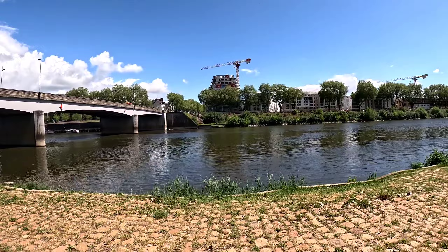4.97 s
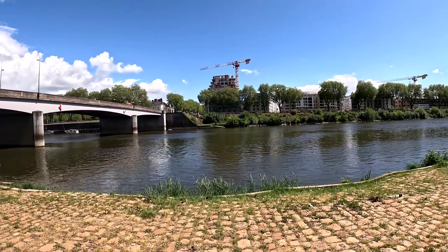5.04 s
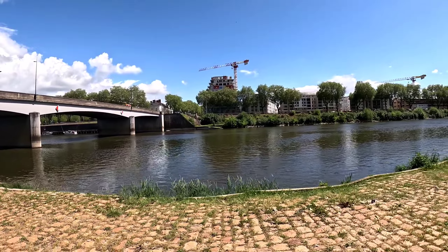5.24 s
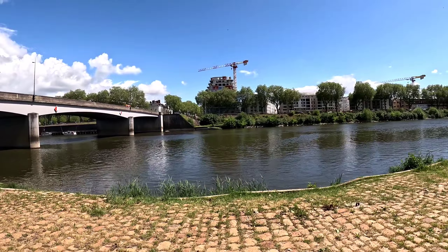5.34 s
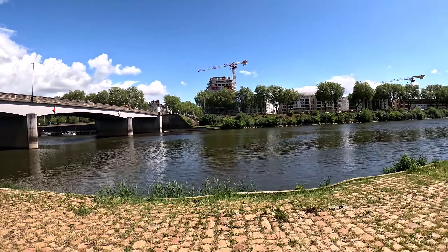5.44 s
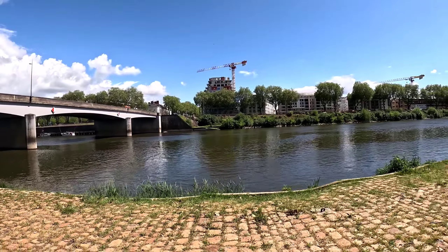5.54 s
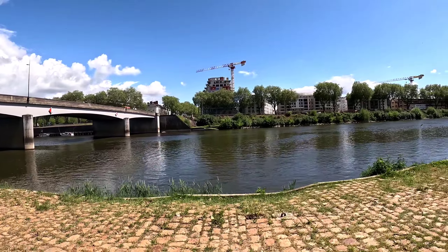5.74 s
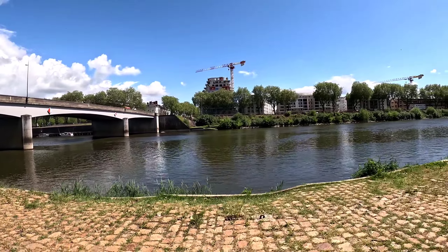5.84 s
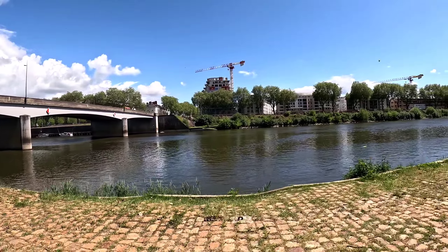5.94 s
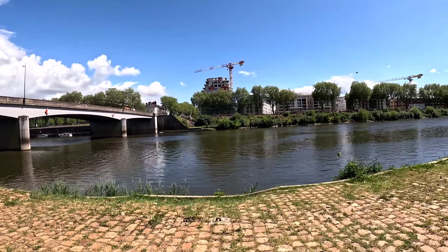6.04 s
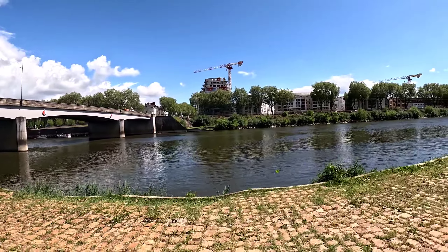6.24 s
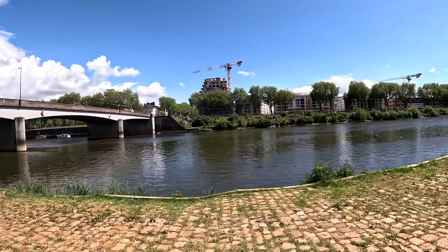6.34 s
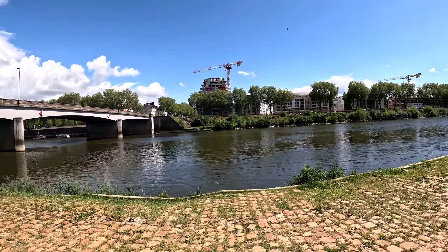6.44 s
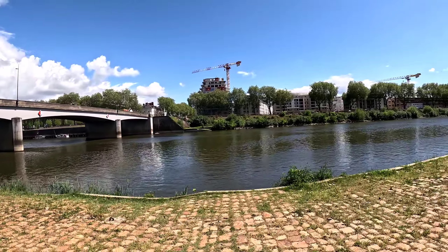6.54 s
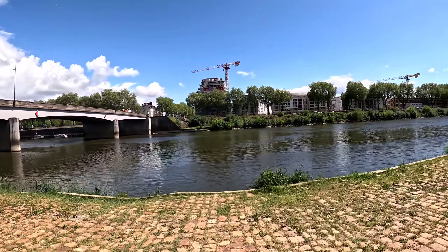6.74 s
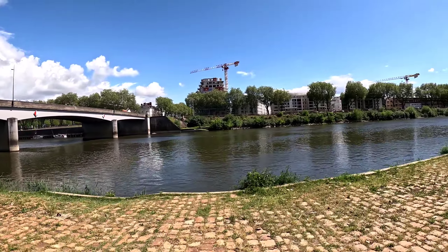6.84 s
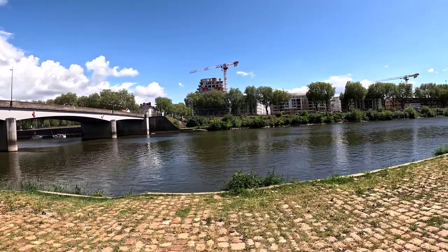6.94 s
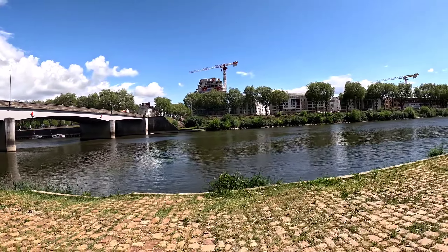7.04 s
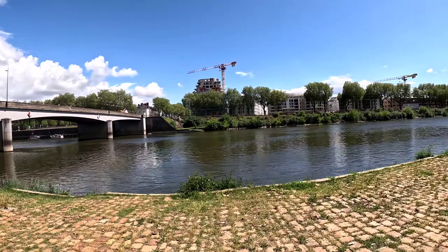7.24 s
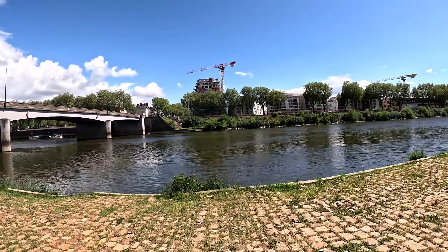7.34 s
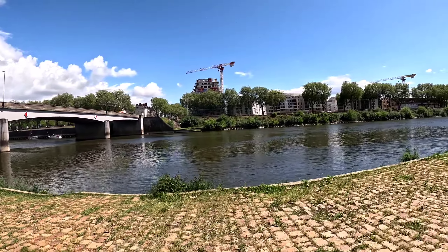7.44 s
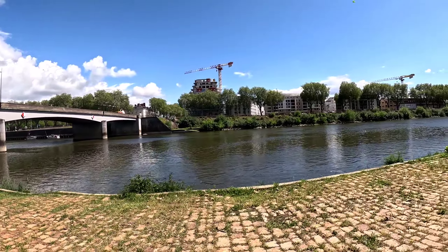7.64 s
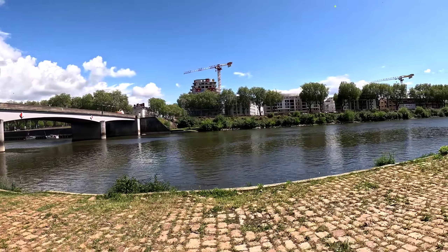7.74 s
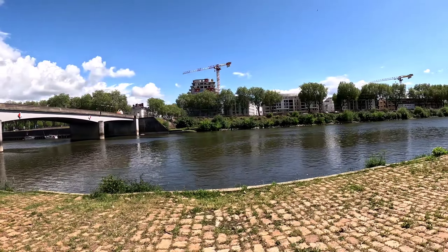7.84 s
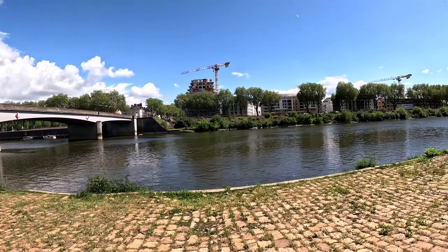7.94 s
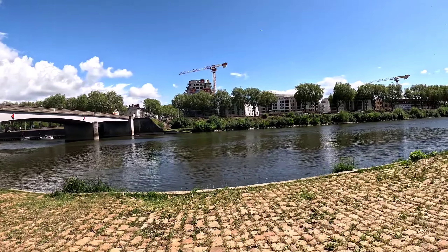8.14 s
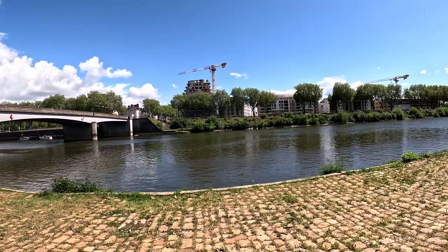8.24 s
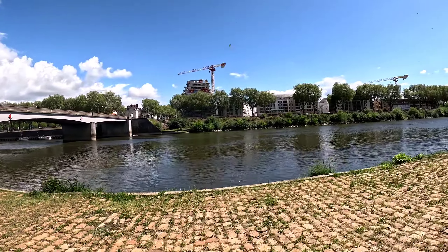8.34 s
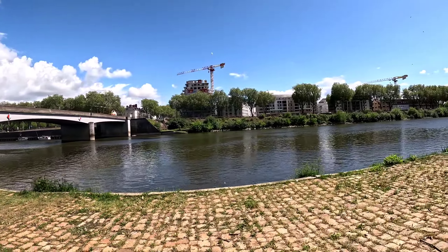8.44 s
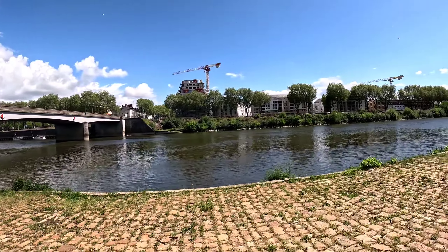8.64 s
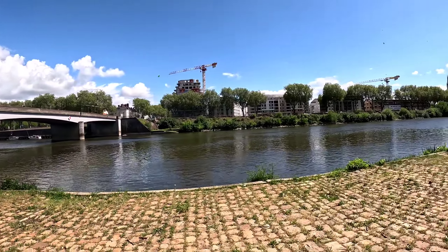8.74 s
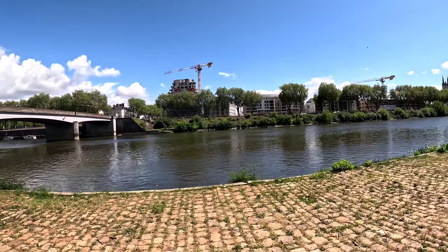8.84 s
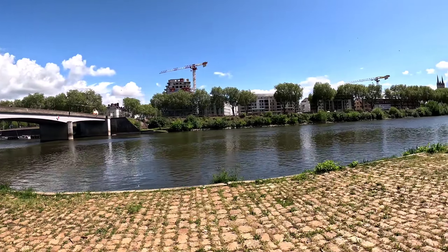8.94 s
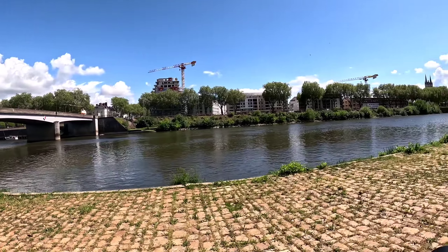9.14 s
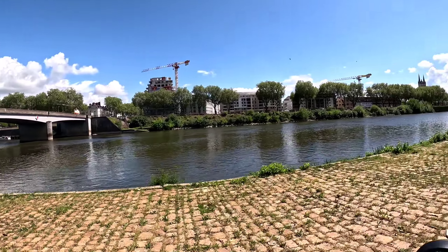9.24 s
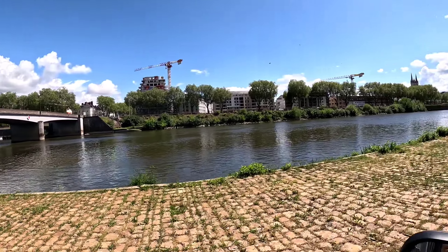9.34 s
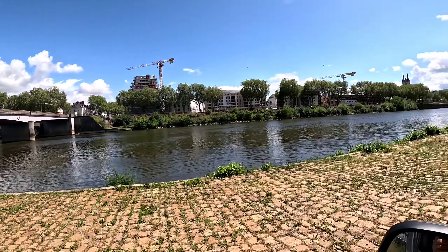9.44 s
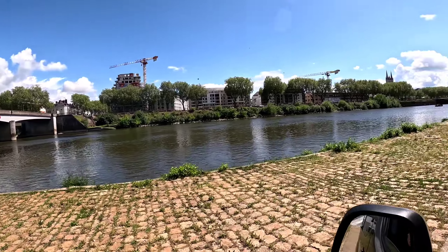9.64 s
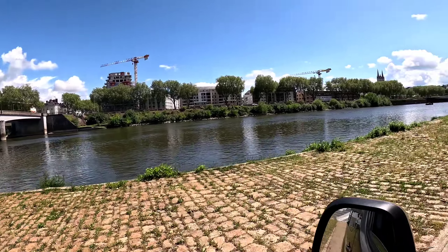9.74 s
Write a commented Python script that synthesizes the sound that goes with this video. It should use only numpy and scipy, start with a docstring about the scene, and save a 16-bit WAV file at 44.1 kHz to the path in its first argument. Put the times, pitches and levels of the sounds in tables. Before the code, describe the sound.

Heard on board, tyres rumble over cobbles with knocks and thumps while a low engine drone slowly rises in pitch.

```python
"""A four-cylinder engine drones, then rises in pitch: a van gathers speed on a cobbled quay, heard on board.
Periodic firing gives the drone, and resonances of the body reinforce its overtones. Random impacts
on the stones make the tyres rumble, patter and crunch grit. Rough patches thump the suspension,
loose fittings knock and clink, flung stones tick, and turbulent air buffets the microphone."""
import sys
import numpy as np
from scipy import signal
from scipy.fft import rfft, irfft, next_fast_len
from scipy.io import wavfile
from scipy.ndimage import uniform_filter1d, minimum_filter1d

SR = 44100
rng = np.random.default_rng(int(sys.argv[2]) if len(sys.argv) > 2 else 0)


def unload_wav(signal):
    """Save mono or channel-first audio to the path in sys.argv[1] as 16-bit WAV at rate SR, clipped to [-1, 1]."""
    wavfile.write(
        sys.argv[1],
        SR,
        np.round(np.clip(np.atleast_2d(signal).T, -1, 1) * 32767).astype(np.int16),
    )


N = 432180
TIME = np.arange(N) / SR

# Levels are relative within each table. Spectral densities: f/Hz, level/dB
EDDY_SPECTRUM = [(4, -27.5), (11, -2.5), (17, 6), (24, -1.5), (36, -6.5), (60, -15.5), (110, -43),
                 (300, -82), (3000, -130)]
RUMBLE_SPECTRUM = [(25, -6), (55, 1), (90, 2.5), (130, -2.5), (200, -7.5), (300, -12), (450, -20.5),
                   (700, -23), (1500, -54), (10000, -110)]
ROAR_SPECTRUM = [(100, -20), (350, 4.5), (600, -0.5), (1100, 1.5), (1600, -5.5), (1900, -5), (2400, -12.5),
                 (3000, -13.5), (4000, -19), (5500, -36.5), (7500, -34.5), (15000, -81.5)]
GRIT_SPECTRUM = [(1200, -12), (3000, 0), (4000, 0.5), (5000, -1), (5600, -4.5), (6500, -6.5), (7400, -15),
                 (8500, -7.5), (9400, -17), (10400, -17.5), (11500, -34.5), (15500, -60)]
GRAVEL_SPECTRUM = [(1000, -23), (3000, 0.5), (5300, -4.5), (7500, -7.5), (10300, -11.5), (11800, -22),
                   (15500, -39)]
TICK_SPECTRUM = [(200, -9.5), (600, 7), (1300, -0.5), (2200, 4.5), (3500, -3), (5200, -9), (6500, -12),
                 (9000, -17), (11500, -29), (15500, -40)]
CLINK_SPECTRUM = [(300, 10), (1100, 4), (2200, -6), (3600, 1), (5600, -4), (6300, -12), (7700, -15),
                  (8700, -15), (11500, -30), (15500, -32)]
KNOCK_SPECTRUM = [(100, -28), (400, 0), (800, 12), (1300, 2.5), (2000, -7.5), (3500, -12.5), (7000, -27),
                  (11000, -38), (15000, -73)]
THUMP_SPECTRUM = [(30, -35.5), (100, 22), (250, 6), (450, 1), (750, 1.5), (1300, -10.5), (3000, -57),
                  (14000, -102)]

# buffeting, which sets in once the van is rolling: t/s, level/dB
WIND_LEVEL = [(0, -44.5), (1.7, -34.5), (2.0, -22.5), (4.7, -20.5), (5.3, -25), (6.1, -20.5), (7.0, -26),
              (7.9, -23.5), (8.55, -28.5), (8.75, -17.5), (9.0, -27.5), (9.2, -25.5), (9.33, -16.5),
              (9.5, -26), (9.8, -21.5)]
# tyre roar, which rumble, grit, gravel and hiss follow: t/s, level/dB
ROAR_LEVEL = [(0.2, -62), (1.25, -54), (2.1, -42.5), (2.75, -43), (3.42, -37.5), (4.2, -43.5),
              (5.25, -46.5), (5.6, -42), (6.7, -40.5), (7.35, -37.5), (7.9, -44), (8.32, -44.5),
              (8.46, -41), (9.2, -44), (9.8, -47.5)]
# ring of a body panel relative to the roar: t/s, level/dB
PANEL_LEVEL = [(1.0, -12), (2.3, -13), (3.1, -11), (3.7, -9.5), (4.4, -9.5), (5.6, -10), (7.2, -13.5),
               (8.0, -15.5), (9.8, -9.5)]
# rougher or smoother paving: t/s, duration/s, change of rumble/dB
PAVING_PATCHES = [(0, 2.8, -2.5), (2.603, 0.093, 6), (2.802, 0.16, 6.5), (3.095, 0.23, 4.5),
                  (3.367, 0.28, -5.5), (3.758, 0.56, 2), (4.752, 0.62, 1.5), (5.44, 0.28, 4),
                  (5.887, 0.105, 4), (6.19, 0.27, 1), (6.423, 0.25, -7.5), (6.66, 1.2, -4),
                  (8.336, 0.11, 3)]
# sunken stones that jolt a wheel: t/s, level/dB
SUNKEN_STONES = [(2.67, -32), (2.92, -38), (5.49, -36), (5.96, -29.5), (6.209, -26), (6.32, -27),
                 (6.97, -27.5), (7.12, -41), (7.379, -35), (8.111, -36), (8.381, -27), (9.32, -28)]
# clumps of gravel crushed by a tyre: t/s, level/dB
GRAVEL_CLUMPS = [(0.08, -72), (0.98, -71), (1.49, -63), (1.57, -78), (2.07, -64), (2.49, -57.5),
                 (3.25, -65), (3.63, -58), (3.88, -59), (4.02, -60), (5.5, -65), (5.81, -61)]

# stones flung by the tyres: t/s, level/dB, ring f/Hz, ring gain, rattle T60/s
STONE_TICKS = [(1.262, -48, 3730, 4.1, 0.026), (1.477, -49, 5430, 2, 0.045), (1.628, -49, 4050, 1.5, .03),
               (1.658, -59, 4300, 6, .015), (1.752, -36.5, 2930, 1.3, 0.024), (2.095, -41, 3100, 4, 0.071),
               (2.559, -42, 3200, 1, 0.036), (3.046, -45, 5920, 1, .05), (3.393, -44, 3320, 2.2, .14),
               (3.472, -36, 5240, 1, 0.044), (3.697, -45, 6000, 1, .03), (3.862, -46, 6300, 2.3, .025),
               (4.022, -49, 6200, 2, .09), (4.317, -46, 5160, 5.6, 0.016), (4.535, -42, 3300, 2.2, 0.17),
               (4.731, -47, 5500, 2, .05), (5.507, -51, 7000, 1, .03), (6.54, -49, 6540, 1, .03),
               (7.283, -43, 3340, 1, .06), (7.304, -46, 6500, 1, 0.058), (7.414, -50, 8000, 1, .04),
               (7.612, -38, 3510, 0.3, 0.081), (8.042, -46.5, 4500, 1, .04), (9.1, -48, 4090, 1, .06),
               (9.516, -49, 3470, 0.89, 0.064)]
# bounces of a metal fitting: t/s, level/dB, ring f/Hz, ring gain, rattle T60/s
METAL_CLINKS = [(2.416, -32.5, 6500, 1, 0.047), (2.4275, -36.5, 5600, 1.2, .03),
                (2.4304, -27.5, 4600, 0.85, 0.02), (2.436, -37, 3730, 0.87, 0.067),
                (2.453, -40.5, 4400, 0.6, 0.1)]
# knocks of loose fittings: t/s, level/dB, ring f/Hz, ring gain, rattle T60/s, treble cutoff f/Hz
FITTING_KNOCKS = [(1.517, -30.5, 850, 0.59, 0.072, 12000), (1.748, -27, 1290, 4, 0.053, 12000),
                  (1.752, -20, 1470, 8.7, 0.064, 12000), (2.171, -24, 980, 1.6, 0.032, 5000),
                  (2.61, -20, 860, 0.62, 0.067, 8000), (2.768, -28, 926, 0.81, 0.036, 4000),
                  (3.398, -23, 1120, 1.3, .06, 5000), (3.473, -26, 900, 0.5, .03, 12000),
                  (3.861, -15.5, 520, 1.2, 0.065, 3500), (3.989, -29, 794, 0.58, .04, 5000),
                  (4.891, -31, 700, 1.3, 0.046, 1500), (4.899, -19, 1300, 1, 0.036, 1600),
                  (7.056, -24, 900, 1.2, 0.035, 4000)]
# blows to the suspension: t/s, level/dB, ring f/Hz, ring gain
SUSPENSION_BLOWS = [(2.904, -21, 240, 4), (2.932, -18, 210, 10), (3.042, -27, 624, 2.3),
                    (3.126, -26, 330, 6.7), (3.151, -28, 297, 8.7), (3.253, -18.5, 228, 4.5),
                    (3.274, -20.5, 427, 6), (3.296, -31, 139, 5.5), (3.328, -25, 405, 2.6),
                    (3.988, -23.5, 522, 2.2), (4.018, -25, 420, 6.5), (4.08, -27, 293, 4),
                    (4.83, -27, 417, 5), (5.677, -24, 570, 4.7), (5.681, -17.5, 291, 1.4),
                    (5.698, -27, 213, 8.9), (5.843, -23.5, 300, 5.6), (5.902, -22, 265, 2.8),
                    (5.934, -16, 418, 2.6), (5.948, -27, 382, 7.8), (5.97, -25, 565, 2),
                    (6.357, -22, 400, 3), (8.384, -21, 298, 4.8)]

# firing rate, which sags under load, climbs and levels off: t/s, f/Hz
FIRING_RATE = [(0.0, 46.0), (0.5, 45.6), (1.0, 44.2), (2.0, 43.6), (2.5, 44.1), (3.0, 45.8), (3.4, 47.7),
               (4.4, 51.4), (6.0, 58.6), (7.0, 62.3), (7.5, 63.8), (8.3, 65.7), (9.4, 67.4), (9.8, 67.3)]
# engine load: t/s, exhaust boom level/dB, overtone level/dB
ENGINE_LOAD = [(0, -41, -58), (1.3, -38, -45.5), (2.35, -31, -40.5), (2.65, -28.5, -40.5),
               (3.3, -24, -40.5), (4.6, -29.5, -42.5), (6.1, -26, -50), (6.8, -20.5, -37.5),
               (8.5, -22.5, -35.5), (9.8, -23, -37)]
# engine overtones: multiple of the firing rate, level/dB
ENGINE_ORDERS = [(2, -4.5), (2.5, -16), (3, -16.5), (3.5, -21), (4, -11.5), (5, -14), (6, -14.5), (7, -16),
                 (8, -25), (9, -24), (11, -25.5), (12, -24), (13, -27.5), (14, -26.5), (15, -24),
                 (16, -25.5), (18, -36.5), (19, -32.5)]
# resonances of the van's body: f/Hz, bandwidth/Hz, gain/dB
BODY_MODES = [(88, 16, -2.5), (186.5, 2.5, 11), (228, 15, -1.5), (267.8, 24, -1), (485.6, 16, -0.5),
              (779, 29, 11)]


def amp(db):
    """Amplitude ratio of a level in decibels."""
    return 10 ** (np.asarray(db) / 20)


def unit(x):
    """Normalisation to an rms of 1."""
    return x / np.sqrt(np.mean(x ** 2) + 1e-20)


def curve(rows, column=1):
    """Linear interpolation of a table column in time."""
    rows = np.array(rows)
    return np.interp(TIME, rows[:, 0], rows[:, column])


def colour(x, spectrum):
    """Minimum-phase, hence causal, filtering to the given spectrum."""
    hz, db = np.transpose(spectrum)
    size = next_fast_len(len(x) + 8192)
    f = abs(np.fft.fftfreq(size, 1 / SR))
    log_gain = np.log(amp(np.interp(np.log(f + 1), np.log(hz + 1), db)))
    response = np.exp(np.conj(signal.hilbert(log_gain)))[:size // 2 + 1]
    return irfft(rfft(x, size) * response, size)[:len(x)]


def drift(hz, size=16384):
    """Slow random modulation: noise of unit rms that rolls off above hz."""
    f = np.arange(size // 2 + 1) * SR / N
    slow = irfft(rfft(rng.standard_normal(size)) * np.exp(-(f / hz) ** 2) * (f > 0), size)
    return np.interp(TIME, np.linspace(0, TIME[-1], size), unit(slow))


def impacts(per_s, spread_db):
    """Shot noise: randomly timed impulses of unequal size."""
    size = amp(spread_db * np.minimum(rng.exponential(1, N), 4))
    return unit(size * rng.choice([-1, 1], N) * (rng.random(N) < per_s / SR))


def resonate(x, hz, width_hz, stages=1):
    """Resonance: identical stages in series, with a gain of 1 at the centre."""
    for _ in range(stages):
        x = signal.lfilter(*signal.iirpeak(hz, hz / width_hz, SR), x)
    return x


def follow_roar(share, cruise_db=-42):
    """Level change in dB, proportional to the roar's departure from its cruising level."""
    return share * (curve(ROAR_LEVEL) - cruise_db)


def blows(rows, spectrum, level_db, rattle, q, rise_s, rattle_s=0.061):
    """Impact excitation: a scrape swells to a contact and rattles away, driving a part's resonance."""
    t = np.arange(SR // 4) / SR - rise_s
    swell = np.minimum(1 + t / rise_s, 1) ** 2

    def blow(db, hz, ring_gain, t60=rattle_s, cutoff_hz=SR):
        """A soft contact acts as a low-pass filter on the force of one blow."""
        decay = amp(-60 * np.maximum(t, 0) / t60)
        force = rattle * rng.standard_normal(len(t)) * swell * decay
        force[np.argmin(abs(t))] += 1
        force = signal.lfilter([1], [1, -np.exp(-2 * np.pi * cutoff_hz / SR)], force)
        ringing = resonate(force, hz, hz / q, stages=2)
        sound = colour(force + ring_gain * ringing, spectrum)
        peak_rms = np.sqrt(uniform_filter1d(sound ** 2, size=128, mode="constant").max())
        return amp(db + level_db) * sound / peak_rms

    out = np.zeros(N)
    for s, *columns in rows:
        span = out[round(s * SR):][:len(t)]
        span += blow(*columns)[:len(span)]
    return out


def buffeting(level_db=2.0, gust_db=2, gust_hz=4):
    """Turbulence: slow eddies press on the microphone, swelling in random gusts."""
    eddies = colour(rng.standard_normal(N), EDDY_SPECTRUM)
    running_rms = np.sqrt(uniform_filter1d(eddies ** 2, size=11000) + 1e-20)
    return amp(curve(WIND_LEVEL) + level_db + gust_db * drift(gust_hz)) * eddies / running_rms


def tread_hiss(level_db=-75, db_per_firing_hz=3.0, flutter_db=1.5):
    """Narrow-band noise from the tread grows with speed and follows the roar."""
    firing_hz = curve(FIRING_RATE)
    speed_db = db_per_firing_hz * (firing_hz - firing_hz.max())
    band = unit(resonate(rng.standard_normal(N), hz=8450, width_hz=1200, stages=2))
    return amp(level_db + speed_db + follow_roar(0.9) + flutter_db * drift(20)) * band


def grit(tyre_load, level_db=-63.0, load_db=0.5):
    """Crushed grit gives shot noise and hiss, amplitude-modulated by the tyre load."""
    grains = (impacts(per_s=500, spread_db=2.1) + rng.standard_normal(N)) * amp(load_db * tyre_load)
    return amp(level_db + follow_roar(1.05)) * unit(colour(grains, GRIT_SPECTRUM))


def gravel(loose_db=-78, flicker_db=2.0, rise_s=0.0035, t60=0.43):
    """Stones crackle under the tread as shot noise; each crushed clump adds an exponential decay."""
    envelope = amp(loose_db + follow_roar(0.86))
    for s, db in GRAVEL_CLUMPS:
        age = np.maximum(TIME - s, 0)
        envelope += np.minimum(age / rise_s, 1) * amp(db - 60 * age / t60)
    pops = impacts(per_s=1100, spread_db=-3.5) * amp(flicker_db * drift(22))
    return envelope * unit(colour(pops, GRAVEL_SPECTRUM))


def stone_ticks():
    """Small flung stones excite narrow, high resonances on impact."""
    return blows(STONE_TICKS, TICK_SPECTRUM, level_db=-1.0, rattle=0.21, q=9.9, rise_s=0.0029)


def metal_clinks():
    """A metal fitting rings in free vibration at each bounce."""
    return blows(METAL_CLINKS, CLINK_SPECTRUM, level_db=2.5, rattle=0.15, q=7.8, rise_s=0.0019)


def fitting_knocks():
    """Loose fittings strike and rattle, exciting heavily damped midrange resonances."""
    return blows(FITTING_KNOCKS, KNOCK_SPECTRUM, level_db=-8.5, rattle=0.21, q=2.2, rise_s=0.00155)


def suspension_thumps():
    """Impulses from the rough road excite low, damped resonances of the suspension."""
    return blows(SUSPENSION_BLOWS, THUMP_SPECTRUM, level_db=-3.0, rattle=0.016, q=3,
                 rise_s=0.00354, rattle_s=0.14)


def tyre_booms(width_s=0.023):
    """A tyre drops onto each sunken stone with a brief swell of low resonant noise."""
    boom = unit(resonate(rng.standard_normal(N), hz=107.5, width_hz=67, stages=2))
    return boom * sum(amp(db) * np.exp(-((TIME - s) / width_s) ** 2) for s, db in SUNKEN_STONES)


def tyre_roar(tyre_load, level_db=-0.5, load_db=0.67, panel_swell_db=3.5):
    """Cobbles slap the tread, making broadband noise and forcing a body panel into resonance."""
    slaps = (impacts(per_s=2500, spread_db=2.03) + rng.standard_normal(N)) * amp(load_db * tyre_load)
    roar = unit(colour(slaps, ROAR_SPECTRUM))
    panel = unit(resonate(slaps, hz=773.5, width_hz=14))
    panel_gain = amp(curve(PANEL_LEVEL) + panel_swell_db * drift(1.7))
    return amp(curve(ROAR_LEVEL) + level_db) * (roar + panel_gain * panel)


def tyre_rumble(level_db=-30.5, throb_db=2.0, throb_hz=16, edge_s=0.015):
    """Roughness excitation: bumps of the wheel merge into low noise, louder on rougher paving."""
    bumps = impacts(per_s=900, spread_db=1.2) * amp(throb_db * drift(throb_hz))
    paving_db = np.zeros(N)
    for s, duration, db in PAVING_PATCHES:
        inside_s = np.minimum(TIME - s, s + duration - TIME)
        paving_db += db * np.clip(inside_s / edge_s + 0.5, 0, 1)
    return amp(level_db + follow_roar(0.81) + paving_db) * unit(colour(bumps, RUMBLE_SPECTRUM))


def engine(waver=0.00192, throb_db=0.9, jitter_rad=0.022, uneven_db=2.0):
    """Periodic firing gives an exhaust boom and overtones that swell as they cross body resonances."""
    firing_hz = curve(FIRING_RATE) * (1 + waver * drift(6.15))
    phase = 2 * np.pi * np.cumsum(firing_hz) / SR
    boom = amp(curve(ENGINE_LOAD, column=1) + throb_db * drift(3.7)) * np.sin(phase)
    phase += jitter_rad * drift(25)  # uneven firings blur the higher overtones
    overtones = np.zeros(N)
    for order, db in ENGINE_ORDERS:
        overtones += amp(db + uneven_db * drift(10)) * np.sin(order * phase + 2 * np.pi * rng.random())
    overtones *= amp(curve(ENGINE_LOAD, column=2))
    ringing = sum(amp(db) * resonate(overtones, hz, width) for hz, width, db in BODY_MODES)
    return np.sqrt(2) * (boom + overtones + ringing)


def scene():
    """Superposition of impacts, engine, air and tyres in one channel."""
    strikes = suspension_thumps() + fitting_knocks() + stone_ticks() + metal_clinks()
    drone = engine()
    air = buffeting()
    tyre_load = drift(8.8)  # changes from stone to stone
    tyres = tyre_rumble() + tyre_roar(tyre_load) + grit(tyre_load)
    tyres += tread_hiss() + tyre_booms() + gravel()
    return (strikes + drone + air + tyres)[None]


def record(dry, fade_in_s=0.18, fade_out_s=0.002, ceiling=0.34, release_s=0.0098, cutoff_hz=15700):
    """Peak limiting holds down the largest swings; short fades and a low-pass filter follow."""
    size = 2 * int(release_s * SR / 2) + 1
    allowed_gain = np.minimum(1, ceiling / (abs(dry[0]) + 1e-9))
    held_gain = minimum_filter1d(allowed_gain, size)
    gain = uniform_filter1d(uniform_filter1d(held_gain, size), size=301)
    fades = np.minimum(TIME / fade_in_s, 1) ** 2 * np.minimum(TIME[::-1] / fade_out_s, 1)
    lowpass = signal.firwin(511, cutoff_hz, window=("kaiser", 9), fs=SR)
    return signal.oaconvolve(dry * gain * fades, lowpass[None], "same")


dry = scene()
out = record(dry)
unload_wav(out)
```